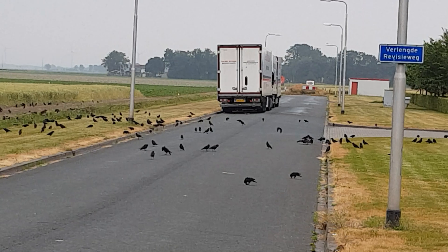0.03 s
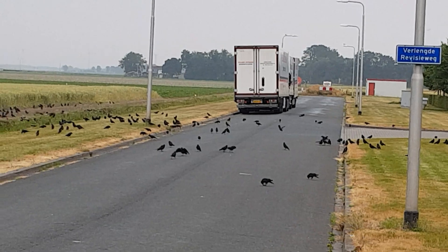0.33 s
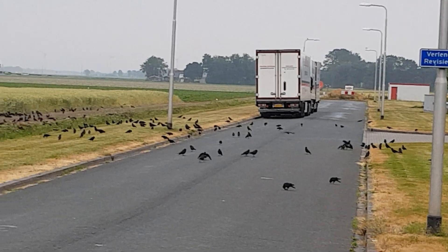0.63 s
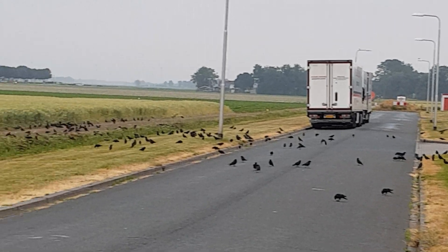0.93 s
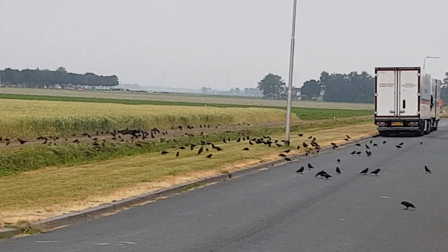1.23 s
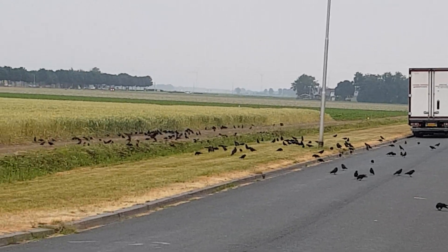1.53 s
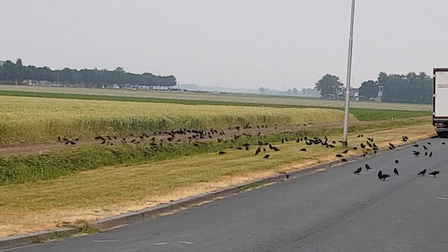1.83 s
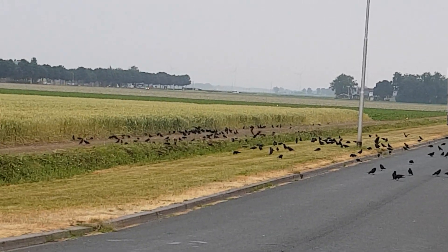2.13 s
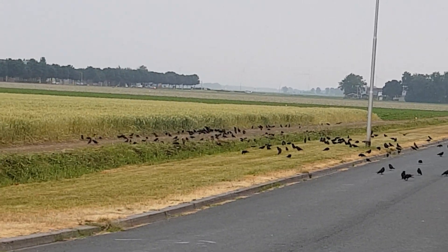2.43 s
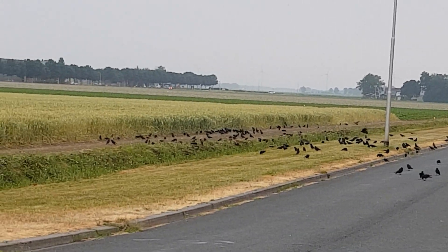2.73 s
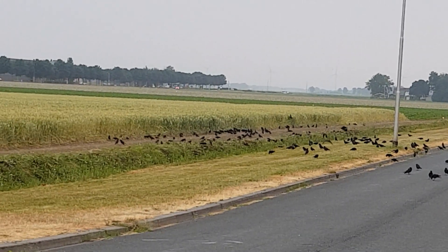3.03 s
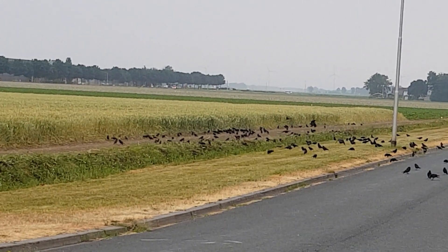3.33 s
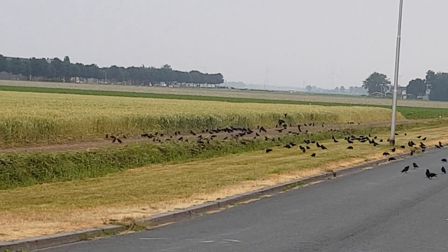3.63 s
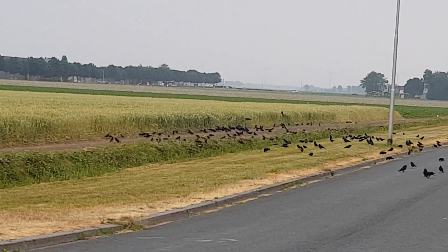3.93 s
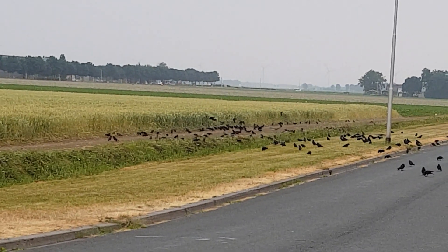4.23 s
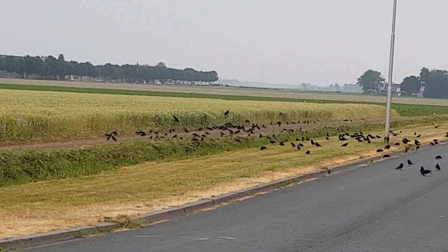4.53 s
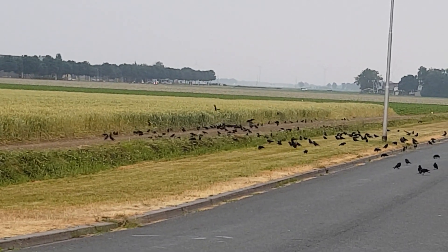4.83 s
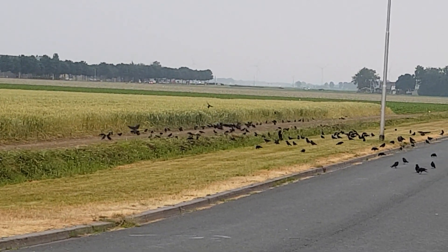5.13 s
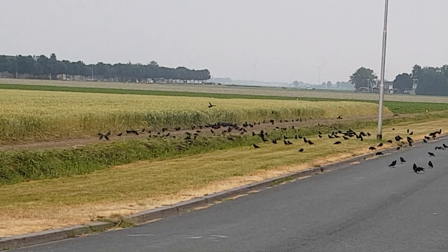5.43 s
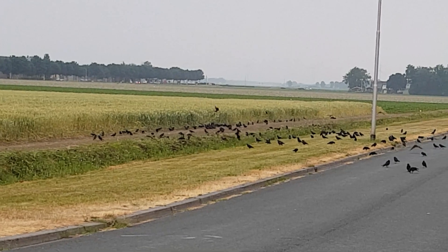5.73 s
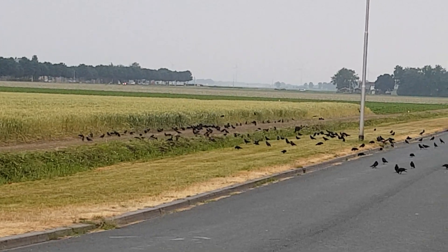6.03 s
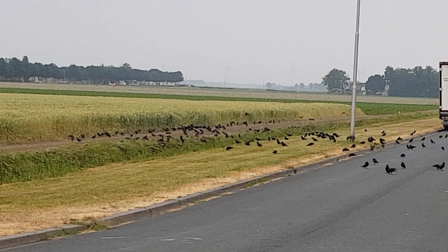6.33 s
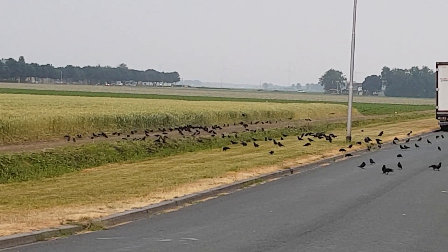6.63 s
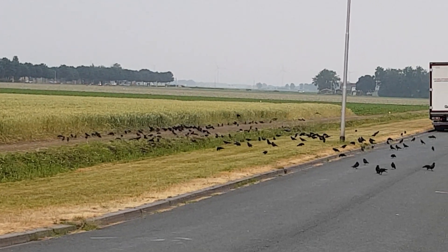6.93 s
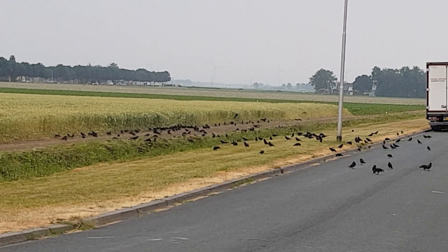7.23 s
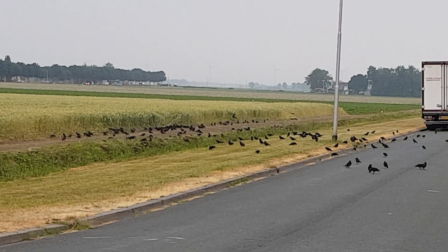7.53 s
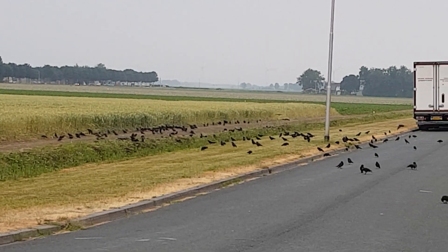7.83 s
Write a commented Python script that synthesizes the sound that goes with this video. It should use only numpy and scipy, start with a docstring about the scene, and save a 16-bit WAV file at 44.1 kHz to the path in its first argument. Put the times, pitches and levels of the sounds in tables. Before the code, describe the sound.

A flock of jackdaws calls throughout beside a country road, heard through a stereo microphone. The nearer birds give short, high yelps that crack and fall into lower, harsher caws, overlapped by quick chips and low rasps, each with a brief tail over the open field. The clearest calls come at about 0.4, 1.8, 3.4, 5.5 and 7.3 seconds, with those at 3.4 and 7.3 from the left. Farther birds chatter in waves, swelling around 0.5, 2, 3.5, 5.6 and 7.4 seconds. Underneath, distant traffic rises during the first second and then eases slightly, joined by the low, steady throb of a lorry idling further off and a faint hiss. Light wind rumbles on the microphone, more on the left, with short buffets strongest just after 2 and 4 seconds. One faint, dull tick sounds close by at about 6 seconds.

```python
"""A verge and field beside a country road: a flock of jackdaws calls, a lorry idles further off.
A full call is a high yelp that cracks and falls into a lower, harsher caw; chips and rasps overlap it.
Each note is syrinx pulses and puffs of air ringing throat and beak, scattered by the field.
Behind them are far traffic, low engine tones, one faint tick and light wind on a stereo microphone."""
import sys
import numpy as np
from scipy import signal
from scipy.fft import rfft, irfft, next_fast_len
from scipy.io import wavfile
from scipy.ndimage import uniform_filter1d

SR = 44100
rng = np.random.default_rng(int(sys.argv[2]) if len(sys.argv) > 2 else 0)


def generate_wav(signal):
    """Clip the signal to [-1, 1] and save it as 16-bit WAV at the path in sys.argv[1]."""
    frames = np.transpose(np.atleast_2d(signal))
    scaled = np.clip(frames, -1, 1) * 32767
    pcm = np.round(scaled).astype(np.int16)
    wavfile.write(sys.argv[1], SR, pcm)


N = 347949
TIME = np.arange(N) / SR
BAND_LIMIT_HZ = 15740
YELP_ARC, CRACK_ARC = np.array([1.0, 0.89]), np.array([1.17, 0.85])  # start, end pitch / mid pitch
HIGH_THROAT_RATIO = 1.913  # high notes: throat tuned near the second harmonic
WINDPIPE_DB = -11  # windpipe resonance, all notes but the yelp


def amp(db):
    """Decibels to gain."""
    return 10 ** (np.asarray(db) / 20)


def unit(x):
    """Scale to rms 1."""
    return x / np.sqrt(np.mean(x ** 2) + 1e-20)


def curve_at(points, hz):
    """Interpolate on a log-frequency axis."""
    f, value = np.transpose(points)
    return np.interp(np.log(hz + 1), np.log(f + 1), value)


def shaped(x, gain):
    """Filter by gain(f)."""
    size = next_fast_len(x.shape[-1])
    return irfft(rfft(x, size) * gain(np.fft.rfftfreq(size, 1 / SR)), size)[..., :x.shape[-1]]


def wander(size, rate_hz):
    """Smooth random drift, rms about 1."""
    noise = rng.standard_normal(size + 4096)
    return unit(shaped(noise, lambda f: 1 / (1 + (f / rate_hz) ** 4)))[:size]


def resonance(f, hz, width_hz):
    """Gain of a resonance, peak 1."""
    return 1 / (1 + (2 * (f - hz) / width_hz) ** 2)


def add(mix, at_s, sound):
    """Mix in a stereo sound."""
    part = mix[:, max(round(at_s * SR), 0):][:, :sound.shape[1]]
    part += sound[:, :part.shape[1]]


def traffic_and_air(drift_db=-0.09, hiss_db=-42.5):
    """Far traffic comes and goes, nearly mono in the bass, under a steady hiss."""
    # traffic and open air: f/Hz, relative density/dB
    spectrum = [(20, -26), (45, 1), (140, -0.5), (220, -7), (320, -11.5), (470, -17), (760, -6),
                (1000, -16.5), (1230, -14.5), (2000, -23), (2650, -26.5), (3200, -36), (4200, -37.5),
                (4700, -33.5), (6200, -35), (7500, -59), (10000, -48.5), (12500, -43), (15700, -46)]
    # left-right likeness: f/Hz, correlation
    coherence = [(50, 1), (150, 0.97), (300, 0.84), (600, 0.26), (1200, 0), (3000, 0.19), (12000, 0.022)]
    # traffic swell: t/s, level/dB
    swell = [(0, -48.5), (.8, -43.5), (2.7, -43), (4.5, -44), (5.5, -45), (7.89, -45.5)]
    left, other = rng.standard_normal((2, N))
    alike = lambda f: np.clip(curve_at(coherence, f), -1, 1)
    right = shaped(left, alike) + shaped(other, lambda f: np.sqrt(1 - alike(f) ** 2))
    wash = unit(shaped(np.array([left, right]), lambda f: amp(curve_at(spectrum, f))))
    low = shaped(wash, lambda f: 1 / (1 + (f / 2200) ** 4))
    traffic_db = np.interp(TIME, *np.transpose(swell)) + drift_db * wander(N, 1.6)
    return low * amp(traffic_db) + (wash - low) * amp(hiss_db)


def lorry(waver=0.0032, throb=0.38, gain_db=-1):
    """Low engine tones waver together with the idle speed; each throbs on its own."""
    # idle tones: f/Hz, level before gain/dB
    tones = [(30, -61), (50, -51), (62.5, -52), (75, -54.5), (87.5, -64), (100, -51.5), (125, -55),
             (145.5, -61), (163, -60), (193, -61), (312, -68.5)]
    clock_s = TIME + waver * np.cumsum(wander(N, 0.93)) / SR
    coarse_s = TIME[::256]
    out = np.zeros(N)
    for hz, db in tones:
        strength = 1 + throb * unit(uniform_filter1d(rng.standard_normal(len(coarse_s)), size=50))
        tone = np.sin(2 * np.pi * (hz * clock_s + rng.random()))
        out += amp(db) * np.interp(TIME, coarse_s, strength) * tone
    return amp(gain_db) * np.sqrt(2) * out


def wind(breeze_db=-49, left_db=3, right_db=-7, crossfeed=0.48, gust_s=0.03, drift_db=3.5):
    """A light breeze and short buffets shake both microphone ports, the left more."""
    # rumble: f/Hz, relative density/dB
    spectrum = [(20, -32), (32, -6), (48, 0.5), (75, 1.5), (120, -9), (250, -34.5), (700, -78)]
    # buffets: t/s, level before port gain/dB
    gusts = [(1.012, -36.5), (2.09, -27.5), (2.19, -35), (2.299, -35), (3.539, -38), (3.69, -39.5),
             (4.041, -35), (4.175, -30), (4.27, -31.5), (7.45, -36)]
    noise = rng.standard_normal((2, N))
    rumble = unit(shaped(noise + crossfeed * noise[::-1], lambda f: amp(curve_at(spectrum, f))))
    power = amp(breeze_db + drift_db * wander(N, 1.0)) ** 2
    for at_s, db in gusts:
        power += amp(db) ** 2 * np.exp(-((TIME - at_s) / gust_s) ** 2)
    return rumble * amp([[left_db], [right_db]]) * np.sqrt(power)


def tick(at_s=6.016, gain_db=-42, decay_s=0.0006, cutoff_hz=1800):
    """One faint, dull tick close by."""
    t = np.arange(512) / SR
    out = np.zeros((2, N))
    add(out, at_s, amp(gain_db) * rng.standard_normal((2, len(t))) * np.exp(-t / decay_s))
    return shaped(out, lambda f: 1 / (1 + 1j * f / cutoff_hz))


def field_scatter(x, wet_db, decay_s, treble_hz=9000, onset_s=0.044):
    """Crops, road and far trees scatter a tail; bass T60 is decay_s / 4, treble dies sooner."""
    hz, t, noise = signal.stft(rng.standard_normal((2, SR)), SR, nperseg=256)
    envelope = amp(-60 * t / decay_s * (4 + hz[:, None] / treble_hz)) * (1 - np.exp(-t / onset_s))
    tail = signal.istft(noise * envelope, SR, nperseg=256)[1]
    return x + amp(wet_db) * signal.fftconvolve(x, tail / np.linalg.norm(tail[0]), axes=1)[:, :N]


def syrinx(length_s, start_hz, mid_hz, end_hz, rough,
           fade_db=-3, jitter=0.0286, flutter=0.42, edge_s=0.012):
    """Jittering pulses on a pitch arc; roughness trades them for puffs of air."""
    t = np.arange(-edge_s / 2, length_s + edge_s, 1 / SR)
    u = np.clip(t / length_s, -0.1, 1.2)
    rough = np.clip(rough, 0, 1)
    hz = start_hz * (1 - u) * (1 - 2 * u) + mid_hz * 4 * u * (1 - u) + end_hz * u * (2 * u - 1)
    hz *= 1 + jitter * (rough + 0.11) * wander(len(t), rate_hz=100)
    phase = (np.cumsum(hz) / SR) % 1
    angle = np.pi * phase + 1e-6
    harmonics = int(BAND_LIMIT_HZ / mid_hz)
    pulses = unit(np.sin((2 * harmonics + 1) * angle) / np.sin(angle) - 1)
    puffs = unit(rng.standard_normal(len(t)) * np.exp(-phase))
    ramps = np.clip(np.minimum(t - t[0], t[-1] - t) / (edge_s + 0.12 * length_s), 0, 1)
    envelope = ramps * amp(fade_db * u) * (1 + flutter * rough * wander(len(t), rate_hz=50))
    return ((1 - rough ** 2) * pulses + rough ** 2 * puffs) * envelope


def throat_gain(f, throat_hz, windpipe_db):
    """Throat and windpipe resonances, dark below 1 kHz and above 3.2 kHz."""
    throat = resonance(f, throat_hz, width_hz=620)
    windpipe = amp(windpipe_db) * resonance(f, 1214, width_hz=210)
    band = (1 - 1 / (1 + (f / 1050) ** 8)) / (1 + (f / 3200) ** 10)
    return (throat + windpipe + amp(-19)) * band


def beak_gain(f, beak_hz, bounce=0.59, facing_db=3):
    """Beak resonance, beamed by a random head direction and combed by a ground bounce."""
    # overtone envelope: f/Hz, gain/dB
    overtones = [(2600, -9.5), (3300, -3.5), (4100, -2), (4700, -0.5), (6200, 2.5), (7200, 0.5),
                 (8700, -4.5), (11500, -6), (15500, -22.5)]
    bounce_s, facing = rng.uniform(0.000312, 0.000884), rng.uniform(-0.83, 1)
    beak = resonance(f, beak_hz, width_hz=1300) + amp(-11)
    beam = amp(facing_db * facing * np.log2(1 + f / 3000))
    ground = 1 - bounce * np.exp(-2j * np.pi * f * bounce_s)
    return beak * amp(curve_at(overtones, f)) * beam * ground


def note(length_s, pitches_hz, rough, throat_hz, beak_hz, db, overtones_db, bearing_deg,
         windpipe_db=WINDPIPE_DB, port_delay_s=0.000409):
    """The syrinx rings throat and beak; the note reaches the nearer port first."""
    drive = syrinx(length_s, *pitches_hz, rough)
    body = shaped(drive, lambda f: throat_gain(f, throat_hz, windpipe_db))
    overtones = shaped(drive, lambda f: beak_gain(f, beak_hz))
    overtones *= amp(1.4 * wander(len(drive), rate_hz=32))  # the treble flickers
    voice = unit(body) + amp(overtones_db) * unit(overtones)
    lead_s = port_delay_s * np.sin(np.radians(bearing_deg)) * np.array([[0.5], [-0.5]])
    return amp(db) * shaped(voice, lambda f: np.exp(2j * np.pi * f * lead_s))


def glide(hz, arc):
    """Start, middle and end pitch."""
    return np.array([hz * arc[0], hz, hz * arc[1]])


def full_call(at_s, yelp_s, crack_s, caw_s, yelp_hz, yelp_pipe_db, caw_hz, sag, caw_rough,
              caw_throat_hz, beak_hz, db, step_db, overtones_db, bearing_deg):
    """Yelp, crack and caw; the voice stops briefly at each change of register."""
    yelp_rough, crack_rough, crack_ratio, break_s = 0.12, 0.21, 0.74, 0.005
    half_shut_db = -3.5  # a half-shut beak weakens the yelp's overtones
    caw_arc = np.array([1.19, 0.88]) ** sag
    yelp_throat_hz = yelp_hz * HIGH_THROAT_RATIO
    parts = [
        (yelp_s, glide(yelp_hz, YELP_ARC), yelp_rough, yelp_throat_hz, half_shut_db, yelp_pipe_db),
        (crack_s, glide(yelp_hz * crack_ratio, CRACK_ARC), crack_rough, caw_throat_hz, 0, WINDPIPE_DB),
        (caw_s, glide(caw_hz, caw_arc), caw_rough, caw_throat_hz, 0, WINDPIPE_DB)]
    for length_s, pitches_hz, rough, throat_hz, dull_db, pipe_db in parts:
        if length_s > 0.01:
            yield (at_s, length_s - break_s, pitches_hz, rough, throat_hz, beak_hz,
                   db, overtones_db + dull_db, bearing_deg, pipe_db)
            at_s += length_s
            db += step_db


def flock_notes(chip_rough=0.21, chip_beak_hz=5280, rasp_beak_hz=4570):
    """Near birds' notes: t/s, then the arguments of note()."""
    # full calls: t/s, yelp/s, crack/s, caw/s, yelp f/Hz, yelp windpipe/dB, caw f/Hz, sag (0 = level),
    # roughness, throat/Hz, beak/Hz, level/dB, step per note/dB, overtones/dB, bearing left/deg
    calls = [(0.213, 0.026, 0.075, 0, 1184, -12, 620, 1, 0.3, 1800, 3456, -55, -0.5, 3.5, 6),
             (0.436, 0.038, 0.028, 0.14, 1317, -4.5, 568.5, 0.55, 0.11, 1790, 4400, -38.5, -2, -11, 0),
             (0.947, 0.057, 0.055, 0.13, 1342, -12, 631, 0.7, 0.34, 2600, 4650, -56.5, -0.5, 4, -6.5),
             (1.752, 0.038, 0.094, 0.071, 1205, -27, 662, 0.9, 0.5, 2010, 3200, -44, -2, -11, 7),
             (2.074, 0.061, 0.062, 0.088, 1235, -2.5, 580.4, 0.9, 0.45, 2290, 3400, -45.5, -0.5, -1.5, 8.5),
             (2.652, 0.068, 0.034, 0.1, 1230, 4, 551, 0.9, 0.16, 2700, 5240, -49, -2, -9.5, 11.5),
             (3.262, 0.051, 0.039, 0.083, 1278, -1, 557, 0.8, 0.12, 2460, 5000, -48.5, -2.5, -18, 12.5),
             (3.449, 0.051, 0.03, 0.14, 1185, -7, 529, 1, 0.15, 2410, 5570, -43.5, -3, -7, 52.5),
             (4.255, 0.066, 0.036, 0.09, 1295, -15, 663.6, 0.8, 0.6, 2400, 5270, -55, 2.5, -5.5, 8.5),
             (5.103, 0.033, 0.035, 0.11, 1315, -12, 593, 0.7, 0.41, 1970, 4370, -54, -1.5, -2.5, -5.5),
             (5.535, 0.044, 0.028, 0.108, 1302, 7, 552, 0.62, 0.07, 1680, 4200, -43, 0, -14, 9),
             (6.236, 0.0087, 0.088, 0.1, 1224, -10, 581.5, 0.8, 0.26, 1940, 3680, -46, -7.5, -7.5, 6.5),
             (6.719, 0.035, 0.00024, 0.082, 1138, -3, 623, 0.64, 1, 2550, 6200, -55.5, -1, 3.5, 4.5),
             (7.128, 0.055, 0.00087, 0.06, 1125, -2, 685, 0.5, 0.33, 1922, 5100, -59, -5.5, 14.5, 11),
             (7.276, 0.052, 0.035, 0.09, 1167, -13, 500, 0.97, 0.28, 2460, 5480, -42.5, -3.5, -4.5, 52),
             (7.579, 0.047, 0.093, 0, 1230, -26, 550, 1, 0.37, 2700, 5400, -50, -4, -1.5, 14)]
    # high chips: t/s, length/s, f/Hz, slide (0 = yelp arc, 1 = crack arc), level/dB, overtones/dB,
    # bearing left/deg
    chips = [(0.147, 0.036, 1228, 0.16, -53, -7, 5), (0.758, 0.048, 935, 1.2, -42, -13.5, 6),
             (1.258, 0.044, 1310, 0.09, -53.5, -2.5, -6), (1.354, 0.051, 1100, 0.1, -63.5, 7.5, 7),
             (1.39, 0.052, 1235, 0.2, -49.5, -7.5, -48), (3.031, 0.027, 1124, 0.98, -46.5, -14.5, -6.5),
             (3.07, 0.047, 1187, 0.55, -56.5, -7, 7.5), (3.993, 0.06, 1305, 0.75, -58, -5, 1),
             (4.9, 0.045, 955, 0, -55, -7.5, -5.5), (4.954, 0.055, 1201, 0.95, -55.5, -6.5, -7),
             (5.418, 0.053, 1170, 0, -56, -17, 8), (6.199, 0.028, 1488, 0, -55.5, -12, 8),
             (7.044, 0.074, 1102, 0.55, -67.5, 15, -17.5)]
    # low rasps: t/s, length/s, f/Hz, sag, roughness, throat/Hz, level/dB, overtones/dB, bearing left/deg
    rasps = [(0.304, 0.11, 655, 0.51, 0.25, 2650, -61.5, 3.5, 3),
             (0.568, 0.13, 675, 0.4, 0.47, 2330, -47, -8.5, 3),
             (1.133, 0.11, 631.7, 0.6, 0.39, 2160, -47.5, -8.5, -5),
             (1.925, 0.11, 692, 0.97, 0.4, 2100, -61, 7.5, -5),
             (2.202, 0.15, 526.4, 1, 0.71, 2000, -51, -25, -52),
             (3.77, 0.14, 605, 0.9, 0.63, 2000, -48.5, -11, -6),
             (4.439, 0.115, 535.6, 0.9, 0.33, 2440, -47.5, -11, 20.5),
             (4.505, 0.13, 587, 0.6, 0.75, 1940, -54, -7, 6),
             (5.724, 0.17, 613.6, 0.15, 0.64, 1820, -46, -19.5, 9)]
    notes = [part for call in calls for part in full_call(*call)]
    for at_s, length_s, hz, slide, *rest in chips:
        arc = (1 - slide) * YELP_ARC + slide * CRACK_ARC
        throat_hz = hz * HIGH_THROAT_RATIO
        notes.append((at_s, length_s, glide(hz, arc), chip_rough, throat_hz, chip_beak_hz, *rest))
    for at_s, length_s, hz, sag, rough, throat_hz, *rest in rasps:
        arc = np.array([1.1, 0.86]) ** sag
        notes.append((at_s, length_s, glide(hz, arc), rough, throat_hz, rasp_beak_hz, *rest))
    return notes


def far_birds(count=130, spread_db=3, overtones_db=-7):
    """The rest of the flock: the near notes, detuned, at random moments, swelling in waves."""
    # flock chatter: t/s, level/dB
    chatter = [(0.0, -56.5), (0.53, -46), (1.74, -57.5), (2.09, -45.5), (2.46, -56.5), (3.12, -79),
               (3.52, -49), (4.81, -67.5), (5.62, -51), (5.93, -69.5), (7.4, -50), (7.89, -62.5)]
    out, notes = np.zeros((2, N)), flock_notes()
    for k, (when, kind, pitch, size, side) in enumerate(rng.random((count, 5))):
        _, length_s, pitches_hz, rough, throat_hz, beak_hz, *_ = notes[int(kind * len(notes))]
        sound = note(length_s, pitches_hz * (0.9 + 0.2 * pitch), rough, throat_hz, beak_hz,
                     spread_db * (2 * size - 1), overtones_db, bearing_deg=90 * side - 35)
        add(out, (k + when - 1) / count * N / SR, sound)
    return unit(out) * amp(np.interp(TIME, *np.transpose(chatter)))


def near_birds():
    """The calls that stand out."""
    out = np.zeros((2, N))
    for at_s, *settings in flock_notes():
        add(out, at_s, note(*settings))
    return out


def scene():
    """Birds over the field, the far ones more scattered, with traffic and wind."""
    near = field_scatter(near_birds(), wet_db=-6, decay_s=1.0)
    far = field_scatter(far_birds(), wet_db=-4, decay_s=0.57)
    return near + far + traffic_and_air() + lorry() + wind() + tick()


def record(dry):
    """Each microphone port colours the sound its own way; then the band limit."""
    # port colour: f/Hz, left minus right/dB
    ports = [(300, -1), (1300, -0.5), (1650, 5.5), (2000, -1.5), (2400, -3.5), (2750, -5), (3300, 1),
             (4000, -3), (5000, 2), (6200, -8), (7000, -1.5), (7800, 10), (9500, -4), (11000, 0)]
    coloured = shaped(dry, lambda f: amp(curve_at(ports, f) * np.array([[0.5], [-0.5]])))
    lowpass = signal.firwin(1023, BAND_LIMIT_HZ, window=("kaiser", 9), fs=SR)
    return signal.oaconvolve(coloured, lowpass[None], "same")


dry = scene()
out = record(dry)
generate_wav(out)
```